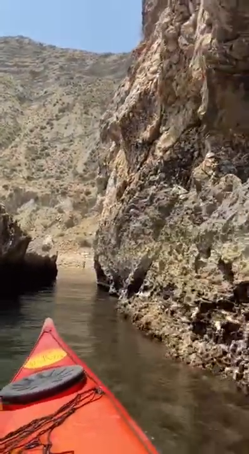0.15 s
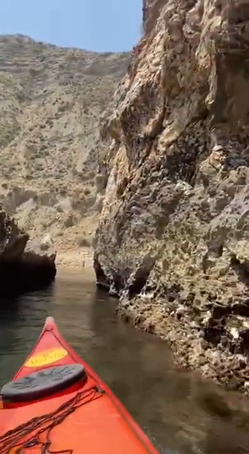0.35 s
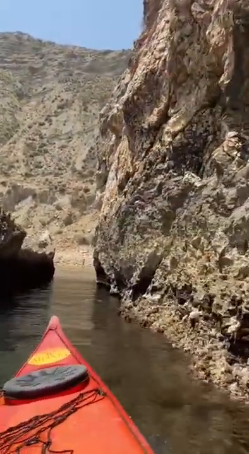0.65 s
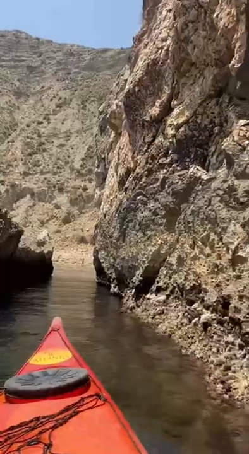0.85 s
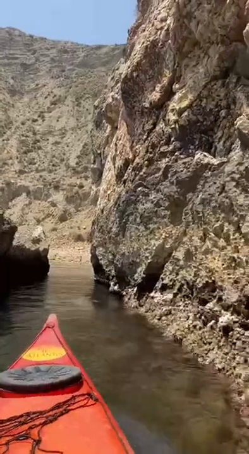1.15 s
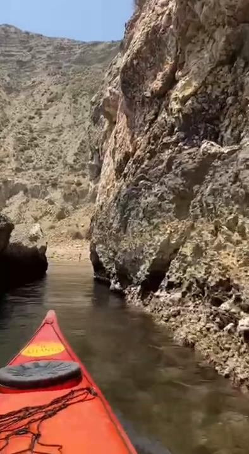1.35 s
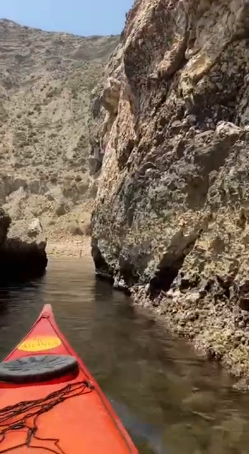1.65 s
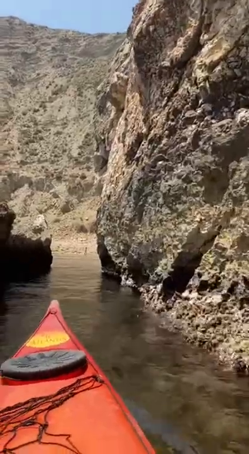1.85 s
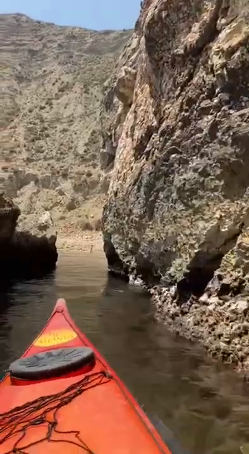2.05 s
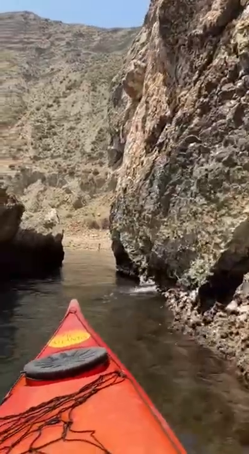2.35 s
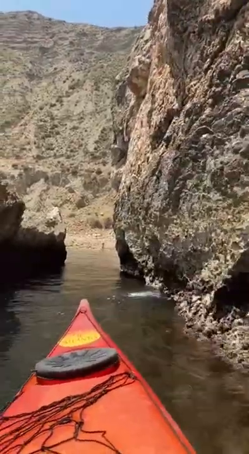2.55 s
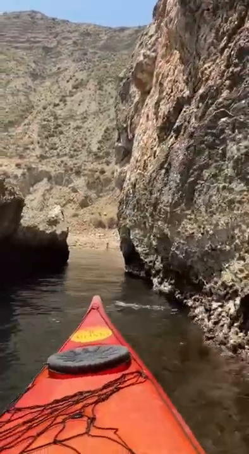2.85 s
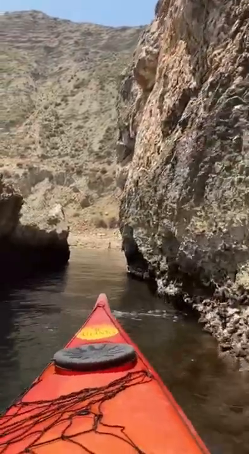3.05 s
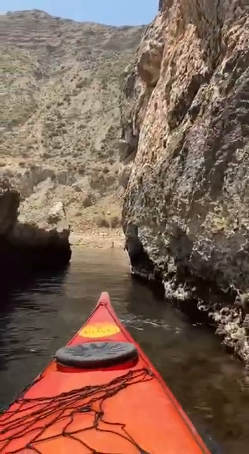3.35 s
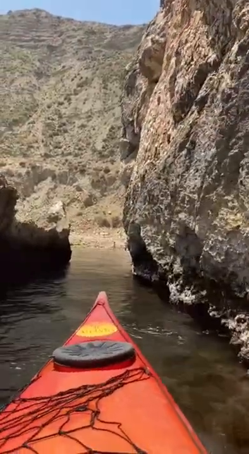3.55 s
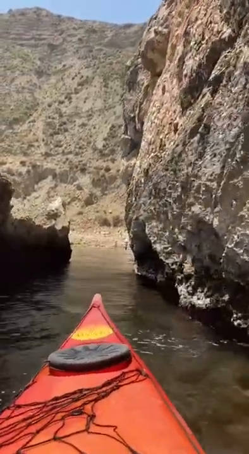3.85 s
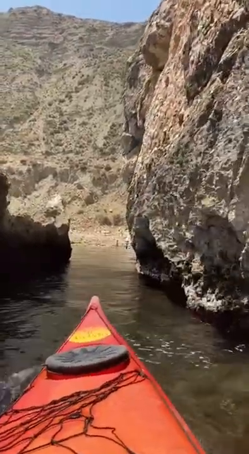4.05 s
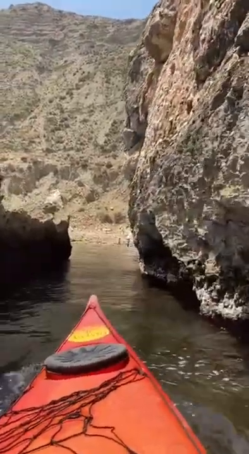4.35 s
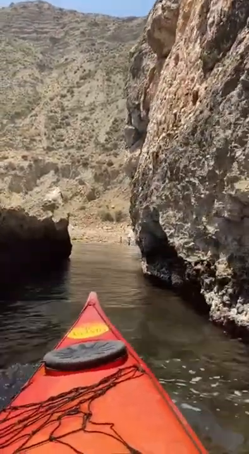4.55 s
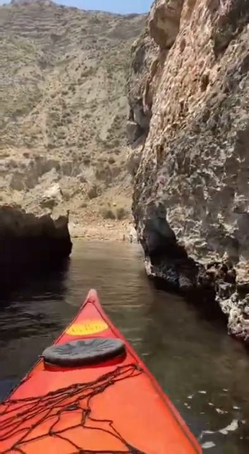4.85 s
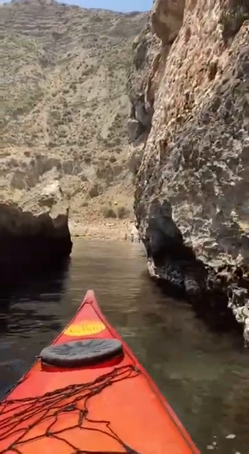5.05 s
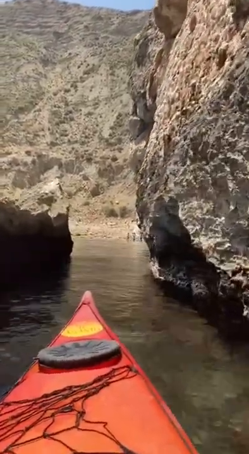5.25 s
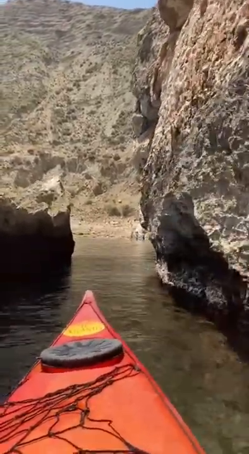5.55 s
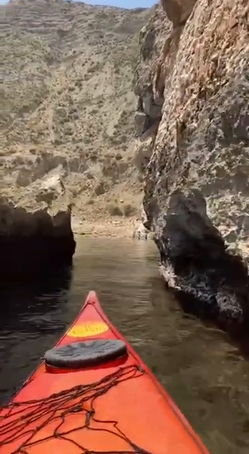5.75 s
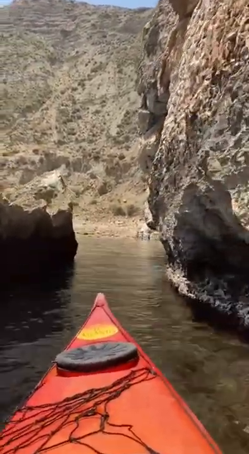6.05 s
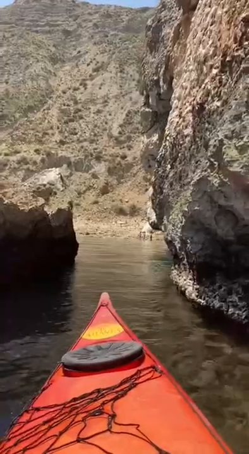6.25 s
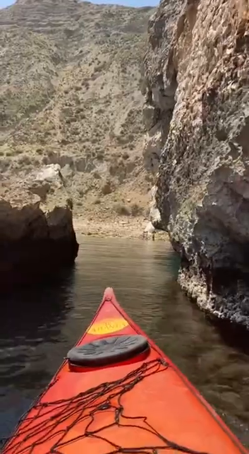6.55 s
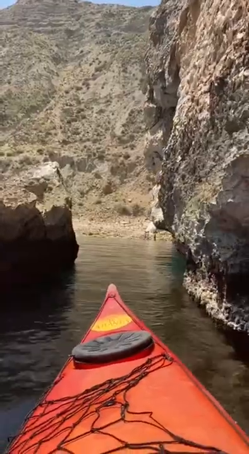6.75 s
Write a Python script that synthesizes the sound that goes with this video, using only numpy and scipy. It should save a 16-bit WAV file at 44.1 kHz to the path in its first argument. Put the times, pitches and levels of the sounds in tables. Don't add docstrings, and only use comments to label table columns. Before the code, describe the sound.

Calm water laps and gurgles along a hollow plastic kayak as the paddle bubbles and drips, with one heavy hull thump midway and another near the end.

```python
import sys
import numpy as np
from scipy import signal
from scipy.fft import rfft, irfft, next_fast_len
from scipy.io import wavfile
from scipy.ndimage import uniform_filter1d

SR = 44100
rng = np.random.default_rng(int(sys.argv[2]) if len(sys.argv) > 2 else 0)


def invert_db(level):
    return 10 ** (np.asarray(level, dtype=float) / 20)


def file_out(sig):
    cols = np.atleast_2d(sig).T
    lim = np.clip(cols, -1, 1)
    pcm = np.round(lim * 32767).astype(np.int16)
    wavfile.write(sys.argv[1], SR, pcm)


N = 304290

# start_s, level_db, t60_s at 1 kHz, tilt_db per octave
CRACKS = [
    (3.121, -18.5, 0.13, -6.5),
    (3.325, -41, 0.47, -5),
    (4.360, -33.5, 0.16, -1),
    (6.436, -30, 0.13, -2),
    (6.543, -26, 0.061, -4),
    (4.697, -42, 0.038, -2),
    (4.704, -42.5, 0.057, -4),
]
# start_s, peak_db,
# pitch_hz, t60_s, swell_s
HULL_MODES = [(3.12, -29, 1410, .04, .001), (3.122, -13.5, 760, 0.058, 0.00058),
              (3.1255, -1, 317, 0.057, 0.0012), (1.278, -33, 3610, 0.011, .001),
              (5.69, -35, 1650, 0.059, .006), (3.135, -8.5, 264, 0.13, 0.002), (3.163, -15, 240, .1, .006),
              (3.140, -8.5, 194, 0.16, 0.0038), (3.142, -2.5, 94, 0.16, 0.023),
              (3.175, -12.5, 72, 0.38, 0.0067), (3.300, -22, 74, 0.62, 0.027),
              (3.50, -31.5, 85, 0.44, 0.021), (1.445, -40, 47, 0.34, 0.046), (2.70, -48, 42.4, 0.13, 0.026),
              (4.697, -28.5, 770, 0.061, 0.0013), (4.360, -26, 731, 0.088, 0.0014),
              (4.363, -19, 285, 0.053, 0.0018), (4.368, -17.5, 199, 0.074, 0.004),
              (6.429, -13.5, 199, 0.045, 0.008), (6.4415, -0.5, 197.4, 0.031, 0.0073),
              (6.435, -21.5, 1400, 0.056, 0.011), (6.4366, -24, 840, 0.092, 0.0058),
              (6.442, -27, 2030, 0.075, 0.0022), (6.456, -33, 115, .15, 0.0091),
              (3.11, -36, 850, .04, .003), (3.134, -20, 780, .05, .002), (3.133, -30, 2000, .03, .002),
              (6.5265, -11, 342, 0.021, 0.0036), (6.5435, -14, 301, .07, 0.0017)]
# start_s, peak_db, pitch_hz,
# left_right_db
FREE_BUBBLES = [(0.893, -30.5, 530, -4), (0.935, -30.5, 820, -12), (1.215, -35, 821, 0),
                (1.742, -27.5, 472, 2.0), (1.97, -28.5, 860, 1), (2.296, -31, 910, 3.0),
                (3.324, -30, 501, 9), (3.701, -31, 590, 1), (3.729, -25, 490, -2), (3.952, -31, 546, 0),
                (4.282, -35, 727, 6), (4.359, -30, 735, 0), (4.468, -29.5, 690, 3.0),
                (4.697, -22, 1060, 6.0), (4.954, -28.5, 513, -2), (5.003, -32, 646, 3.5),
                (6.071, -31, 507, 1.5), (6.443, -20, 866, 1.0), (6.663, -24.5, 484, 2.0),
                (6.813, -30.5, 790, 11),
                (0.1496, -24.5, 1300, 2.0), (0.2049, -25, 1380, 7), (0.3356, -35.5, 2820, 0.0),
         (0.4913, -34.5, 1080, 8), (0.8974, -32, 1200, 6), (1.2795, -34, 1420, 16), (1.348, -33.5, 1020, 3),
         (1.4511, -35.5, 1980, 9), (1.5309, -29, 1400, 0.5), (3.1218, -13.5, 1420, 4),
         (3.5074, -35.5, 1980, 6), (3.6092, -24.5, 1380, -1.0), (3.7574, -37, 1610, 1.0),
         (4.0751, -33, 1560, 2.0), (4.4717, -36, 1380, 7), (4.4917, -31, 1360, 2.0),
         (4.5346, -29.5, 2220, 2), (5.0424, -28.5, 1190, 0.5), (5.2994, -34.5, 2090, -14),
         (5.636, -34.5, 1380, 3.0), (5.6755, -25.5, 1200, 14), (5.8436, -34, 1570, 8),
         (5.898, -33.5, 1570, 1.0), (6.2038, -35, 2420, -27), (6.4453, -21, 1450, -0.5),
         (6.546, -19.5, 1220, -1), (6.8129, -41, 1710, 0.5), (6.8623, -30, 1250, -0.5),
                (0.0643, -38.5, 2770, -1.0), (1.1767, -43, 3610, 2.0), (1.2116, -43, 3640, 1.0),
         (1.3458, -42, 3200, 0.0), (1.5693, -36, 2370, 0.5), (2.7082, -44, 2330, 0.0),
         (3.3228, -41, 2970, 2), (4.0467, -41, 3460, 0.0), (4.2996, -38.5, 2370, -2.0),
         (4.3635, -34, 2680, -1.0), (4.5865, -35, 2250, -2.0), (4.6016, -33, 2640, -1.0),
         (4.6453, -40, 2220, -0.5), (5.0015, -43, 2280, 1.0), (5.1472, -38.5, 3200, 1.0),
         (5.3368, -39.5, 2520, 0.0), (5.4056, -41, 3690, -1.5), (5.5747, -41, 2020, 1.0),
         (5.7528, -45, 3730, -0.5), (6.1135, -45, 2440, -1.0), (6.1689, -38, 2740, -0.5),
         (6.317, -37, 3320, 2.0), (6.5231, -27, 2120, 2.5), (6.5445, -28.5, 2360, 4.5),
         (6.6119, -38, 2500, 0.0), (6.8628, -34, 2350, -2.0),
                (3.356, -31, 732, 1.5), (3.424, -33, 826, 2.5), (3.511, -35, 807, 0.5), (3.669, -33, 1150, 0.5),
           (3.735, -30, 910, 0.0), (4.524, -31, 799, 3.5), (4.555, -30, 818, 7.0), (4.569, -27, 790, 4.5),
           (4.605, -30, 820, 4.0), (4.706, -28, 759, 4.0), (4.812, -38, 1100, 4.0), (4.877, -36, 875, 3.5),
           (5.053, -29, 1170, 4.0), (5.177, -42, 756, 4.0), (5.234, -36, 686, 1.0), (5.284, -39, 1010, 4.0),
           (5.299, -37, 816, 4.5), (5.387, -39, 818, 4.5), (5.696, -29, 1683, 5.0), (5.942, -34, 692, 3.0),
           (6.477, -21.5, 1090, 1.0), (6.502, -22, 1320, -0.5), (6.514, -26, 1360, 0.0),
           (6.527, -21, 1330, -1), (6.56, -27, 1180, 1.5), (6.574, -31, 1230, 1)]
# start_s, peak_db, pitch_hz, left_right_db
HELD_BUBBLES = [(0.258, -35, 862, 7.5), (1.498, -41, 654, 6), (1.617, -38, 1210, -5),
                (1.666, -25.5, 650, -4), (1.77, -32.5, 955, 2), (2.084, -30.5, 666, 6),
                (3.41, -28, 546, 13), (3.61, -30, 472, -4), (4.6977, -26.5, 1256, 3.5),
                (5.041, -33, 960, 4.5), (5.211, -29.5, 740, 3.5), (6.1689, -31.5, 1050, 4),
                (6.524, -20.5, 501, -2)]
# start_s, peak_db, pitch_hz, t60_s
GULPS = [(0.005, -24, 197, 0.12), (6.562, -19, 330, .07), (0.814, -24.5, 312, 0.043),
         (1.033, -30.5, 397, 0.1), (1.53, -31, 335, 0.11), (1.901, -20, 196, 0.05),
         (1.929, -18.5, 138, 0.1), (1.97, -24, 195, 0.077), (1.998, -22, 127, 0.076),
         (2.028, -25, 284, 0.093), (2.578, -31, 117, 0.13), (3.407, -22.5, 214, 0.052),
         (3.755, -23.5, 250, 0.074), (3.998, -26.5, 176, 0.079), (4.49, -26.5, 170, 0.057),
         (4.558, -24.5, 144, 0.1), (4.611, -23, 246, 0.075), (4.735, -25, 236, 0.04),
         (4.911, -24.5, 236, 0.076), (6.135, -24.5, 236, 0.041), (6.505, -17.5, 382, 0.055)]
# start_s, peak_db, t60_s
DROPS = [(0.062, -27, 0.025), (0.151, -30.5, 0.035), (0.2698, -33.5, 0.044), (0.5591, -46.5, 0.055),
         (0.728, -37.5, 0.036), (1.2785, -55, 0.045), (1.345, -38, 0.15), (1.39, -37, 0.11),
         (2.141, -48, 0.041), (3.12, -26, 0.051), (3.711, -48, 0.049), (3.755, -35.5, 0.04),
         (4.162, -44, 0.042), (4.365, -34, 0.049), (4.6967, -38, 0.048), (5.0095, -34, 0.043),
         (5.1474, -33, 0.019), (5.2225, -34.5, 0.039), (5.6387, -26.5, 0.062), (5.908, -33, 0.047),
         (6.068, -36, 0.04), (6.2038, -32.5, 0.045), (6.4383, -51, 0.045), (6.6836, -33, 0.057),
         (6.7396, -43, 0.045), (6.868, -52, 0.045)]
# pitch_hz, level_db per Hz
WATER_SPECTRUM = [(15, -50), (25, -34.5), (76, 3), (168, -5.5), (290, -6.5), (426, -13), (1360, -17.5),
                  (1850, -21.5), (3620, -28.5), (4690, -28), (6070, -30.5), (9400, -37), (11900, -54.5),
                  (15400, -89), (22000, -120)]
# pitch_hz, level_db, share of the wash's swing
CALM = [
    (75, -50.5, .2),
    (250, -46.5, 0.39),
    (1003, -50.3, 0.49),
]
# crest_s, lift_db, length_s, pitch_hz
SLOSHES = [(0.0, 13, 0.061, 229), (.235, 3, 0.25, 643), (.496, 11.5, 0.37, 28.8), (.817, 5, .085, 2290),
           (1.488, 12.5, 0.097, 3080), (1.494, 24.5, 0.071, 35), (1.77, 7.5, 0.021, 636),
           (1.885, 9.5, .02, 1500), (1.953, 17.5, 0.072, 280), (2.035, 8.5, 0.037, 497),
           (2.581, 12, .039, 142), (3.305, 11.5, .038, 159), (3.337, 24, 0.023, 97),
           (3.345, 17.5, 0.035, 2240), (3.384, 8.2, 0.33, 64), (3.738, 9.2, 0.084, 605),
           (4.026, 16.5, 0.12, 97), (4.413, 6.5, 0.16, 116), (4.578, 12.5, 0.055, 1500),
           (4.743, 12, 0.018, 141), (5.125, 2, 0.14, 568), (5.32, 6.5, 0.016, 894),
           (5.691, 7.9, 0.034, 596), (5.942, 3.8, 0.056, 689), (6.294, 5.5, 0.094, 391),
           (6.47, 40, .021, 32), (6.51, 18, 0.082, 1730), (6.539, 17.5, 0.068, 227), (6.743, 6, .039, 454),
           (6.9, 15, .026, 792)]
# centre_s, drop_db, length_s, pitch_hz
LULLS = [(0.236, 8, 0.041, 50), (0.4, 3, 0.049, 588), (1.11, 3.5, 0.022, 601), (1.269, 4, 0.17, 340),
         (1.63, 5.5, 0.17, 135), (2.496, 3, 0.052, 250), (2.85, 9.5, 0.075, 2027), (3.3, 5, 0.099, 896),
         (4.281, 8.1, 0.036, 109), (4.657, 9.9, 0.038, 599), (4.924, 7.9, 0.037, 87), (5.46, 8, 0.067, 888),
         (5.627, 1, 0.018, 199), (6.077, 5.2, 0.093, 97), (6.391, 8.5, 0.021, 546), (6.636, 4.6, 0.036, 75)]
# time_s, level_db
WASH = [(0.0, -54.5), (0.13, -64), (0.4, -66.5), (1.29, -61), (2.0, -56.2), (2.3, -63.5), (2.54, -65.5),
        (2.65, -62.5), (3.07, -64.5), (3.32, -57), (3.57, -58.5), (4.19, -58), (4.38, -61.5), (4.6, -55),
        (4.9, -61.5), (6.05, -59.5), (6.23, -57.5), (6.9, -56)]
# pitch_hz, width_hz, lift_db
HULL_COLOUR = [(126, 17.3, 4.5), (357, 82, 4), (665, 23.3, 1), (1380, 200, 0.5)]
# pitch_hz, level_db
SPREAD = [(60, -31), (200, -26), (350, -12), (620, -4), (1100, -1), (1500, -5.5), (2400, 0), (3500, -2),
          (4700, 1), (5500, 4), (7600, 2), (9500, -1), (10800, 11), (11800, 0)]
# pitch_hz, half_width_hz, depth_db
SUM_DIPS = [(4640, 380, -36), (11500, 1700, -14)]
# pitch_hz, half_width_hz, depth_db
DIFFERENCE_DIPS = [(1850, 180, -14), (6450, 950, -30)]
# time_s, width_factor
DIP_WIDTH = [(0, 0.45), (.35, .8), (.75, .5), (1.3, 0.8), (1.45, 1.4), (1.7, 0.96), (2.3, 0.82),
             (3.05, 0.43), (3.25, 1.35), (3.75, 1.27), (4.0, .6), (4.5, 0.61), (5.0, 1.22), (5.3, 0.7),
             (5.57, 1.44), (6.15, .7), (6.3, 1.53), (6.9, 0.88)]
# pitch_hz, margin_db
SUM_GATE = [(1500, -13), (2600, -8.5), (6000, -8), (8000, -4), (9200, -1), (10200, 4), (11000, 10),
            (12000, 14)]
# pitch_hz, margin_db
DIFFERENCE_GATE = [(1500, -11), (3300, -8), (5000, -9), (8000, -6), (9500, -8), (11500, -7), (12000, -2)]

RISE_SHARE, REACH_OCTAVES = 1.12, 1.45
RING_S, RING_SHRINK, HELD_RING_S = 0.031, 0.3, 0.082
UNDER_DB, WHIM_DB = 8, 4
CUTOFF_HZ = 11800


def knocks():
    out = np.zeros(N)
    t = np.arange(9000) / SR
    for s, db, t60, tilt_db in CRACKS:
        for octave in range(-1, 4):
            hz = 1000 * 2.0 ** octave
            octave_t60 = t60 * 2 ** (-0.2 * octave)
            fade = invert_db(db + tilt_db * octave - 60 * t / octave_t60) * (1 - np.exp(-t / 0.0047))
            noise = rms_one(rng.standard_normal(len(t)))
            crack = band(fade * noise, hz / np.sqrt(2), hz * np.sqrt(2))
            add(out, s, crack * invert_db(15 - 2.66 * octave))
    for s, db, hz, t60, swell_s in HULL_MODES:
        add(out, s, plop(db, hz, t60, swell_s, glide=0))
    return out


def bubbles():
    centre, lean = np.zeros(N), np.zeros(N)
    free = FREE_BUBBLES
    for rows, ring_s, shrink in (free, RING_S, RING_SHRINK), (HELD_BUBBLES, HELD_RING_S, 0):
        for s, db, hz, pan_db in rows:
            t60 = ring_s * (1000 / hz) ** shrink
            ring = plop(db - 2.5, hz, t60, swell_s=0.00075, glide=0.052)
            add(centre, s, ring)
            add(lean, s, ring * np.tanh(pan_db / 17))
    for s, db, hz, t60 in GULPS:
        add(centre, s, plop(db - 6, hz, t60, swell_s=0.012, glide=0.12))
    return centre, lean


def plop(peak_db, hz, t60, swell_s, glide):
    t = np.arange(int(t60 * SR * 1.2) + 50) / SR
    shape = (1 - np.exp(-t / swell_s)) * invert_db(-60 * t / t60)
    phase = 2 * np.pi * hz * (t + glide * t * t / t60 / 2)
    return invert_db(peak_db) * shape / shape.max() * np.sin(phase)


def drops():
    out = np.zeros(N)
    t = np.arange(2000) / SR
    for (s, db, t60), noise in zip(DROPS, rng.standard_normal((len(DROPS), 2000))):
        fade = invert_db(db + 2 - 60 * t / t60) * (1 - np.exp(-t / 0.008))
        add(out, s - 0.004, fade * noise)
    return band(out, 2600, 13000)


def froth(per_s, level_db, spread_db):
    lapping_db = stirring()[2]
    out = np.zeros((2, N))
    for when, pitch, size, life, side in rng.random((1200, 5))[:int(per_s * N / SR)]:
        hz = 480 * 2 ** (3.1 * pitch ** 1.2)
        db = lapping_db[int(when * N)] + level_db
        db = db - 3 * np.log2(hz / 1000) - spread_db * np.log(1 - 0.8 * size)
        ring = plop(db, hz, (14 + 36 * life) / hz, swell_s=0.0011, glide=0.055)
        add(out, when * N / SR, ring * [[1], [2 * side - 1]])
    return out


def water(patchy_db, grain_per_cycle, grain_db, size_db):
    levels = stirring()
    levels[3] = levels[3] + 3 + 0.24 * (levels[2] + 46.5)
    levels.insert(3, 0.53 * levels[2] + 0.44 * levels[3] - 3.5)
    edges = 28 * 2 ** np.arange(0, 8.9, 0.44)
    groups = np.zeros((5, 2, N))
    white = rng.standard_normal((2, 2, N))
    chance = rng.random((2, 2, N))
    sizes = invert_db(size_db * np.minimum(rng.exponential(1, (2, N)), 4)) * rng.choice([-1, 1], (2, N))
    together = drift(9.0)
    for k, (low, high) in enumerate(zip(edges, edges[1:])):
        hz = np.sqrt(low * high)
        struck = np.roll(chance[k % 2], 1499 * k, axis=1) < grain_per_cycle * np.sqrt(hz) / SR
        grains = np.roll(sizes, 997 * k, axis=1) * struck
        mix = white[k % 2] + invert_db(grain_db) * rms_one(grains)
        gain = invert_db(at_hz(WATER_SPECTRUM, hz) + patchy_db * (0.49 * together + drift(28.6)))
        groups[np.searchsorted([130, 450, 2200, 4600], hz)] += gain * band(mix, low, high)
    return sum(invert_db(level + 1.5) * rms_one(g) for level, g in zip(levels, groups))


def stirring():
    t = np.arange(0, N + 64, 64) / SR
    wash_db = np.interp(t, *np.transpose(WASH))
    levels = []
    for hz, db, share in CALM:
        calm_db = db + share * (wash_db - wash_db.mean())
        lull_db = swell(LULLS, t, hz, 1).sum(axis=0)
        lift = 1 + np.sum(invert_db(swell(SLOSHES, t, hz, RISE_SHARE)) - 1, axis=0)
        levels.append(calm_db - lull_db + 20 * np.log10(lift))
    return [np.interp(np.arange(N) / SR, t, level) for level in levels + [wash_db]]


def swell(rows, t, hz, rise_share):
    s, db, length, pitch = np.transpose(rows)[:, :, None]
    ago = (t - s) / (length * np.where(t < s, rise_share, 1))
    octaves = np.log2(pitch / hz) / REACH_OCTAVES
    return db * np.exp(-ago ** 2 - octaves ** 2)


def drift(rate):
    r = np.exp(-80 * np.pi * rate / SR)
    slow = signal.lfilter([1], [1, -2 * r, r * r], rng.standard_normal(N // 40 + 2002))[2000:]
    return np.interp(np.arange(N) / 40, np.arange(len(slow)), rms_one(slow))


def scattered(x, t60):
    t = np.arange(600) / SR
    tail = rng.standard_normal(len(t)) * invert_db(-60 * t / t60)
    tail[0] = 1.7
    return signal.fftconvolve(x, tail / np.linalg.norm(tail))[:N]


def wandering_dips(x, dips, sink, flutter_db, widen):
    hz, s, cells = signal.stft(x, SR, nperseg=1024)
    at = np.minimum((s * SR).astype(int), N - 1)
    for one in dips:
        width = widen[at] * invert_db(flutter_db * drift(15.6)[at])
        cells = cells * dip(hz[:, None], [one], 1 - sink * (width - 1), width)
    return signal.istft(cells, SR, nperseg=1024)[1][:N]


def dip(hz, dips, shift=1, widen=1):
    total_db = 0
    for centre_hz, width_hz, db in dips:
        total_db = total_db + db * np.exp(-((hz - centre_hz * shift) / (width_hz * widen)) ** 2)
    return invert_db(total_db)


def rms_one(x):
    return x / np.sqrt(np.mean(x ** 2) + 1e-20)


def at_hz(points, hz):
    points_hz, level_db = np.transpose(points)
    return np.interp(np.log(hz), np.log(points_hz), level_db)


def band(x, low_hz, high_hz):
    return signal.sosfilt(signal.butter(2, [low_hz, high_hz], "band", fs=SR, output="sos"), x)


def add(out, s, piece):
    i = int(s * SR)
    out[..., i:i + piece.shape[-1]] += piece[..., :N - i]


def scene():
    total, difference = (water(patchy_db=3.0, grain_per_cycle=3.0, grain_db=-4.5, size_db=2.5)
                         + froth(per_s=160, level_db=2.8, spread_db=3.5))
    centre, lean = bubbles()
    spits = drops()
    near = centre + spits + knocks()
    size = next_fast_len(N + 4096)
    hz = np.maximum(np.fft.rfftfreq(size, 1 / SR), 1)
    total, difference = rfft([total, difference], size) * dip(hz, HULL_COLOUR)
    dip_centres = [centre_hz for centre_hz, *_ in DIFFERENCE_DIPS + SUM_DIPS[:1]]
    swaps = np.sign(np.prod([centre_hz - hz for centre_hz in dip_centres], axis=0))
    difference = difference + (0.15 - 0.6j * swaps) * total
    difference = difference + invert_db(3.0) * rfft(scattered(near, t60=0.006), size)
    difference = irfft(difference * invert_db(at_hz(SPREAD, hz)), size)[:N]
    difference = wandering_dips(difference, DIFFERENCE_DIPS, sink=-0.06, flutter_db=3.0, widen=np.ones(N))
    difference = difference + 0.5 * lean + 0.055 * band(near, 20, 260)
    widen = np.interp(np.arange(N) / SR, *np.transpose(DIP_WIDTH))
    total = irfft(total, size)[:N] + near
    total = wandering_dips(total, SUM_DIPS, sink=0.07, flutter_db=1.5, widen=widen)
    total = total + 0.4 * band(spits, 3900, 5300) + 0.2 * band(spits, 9500, 11800)
    return np.array([total + difference, total - difference])


def mute_weak_bands(x):
    hz, s, cells = signal.stft([x[0] + x[1], x[0] - x[1]], SR, nperseg=1024, noverlap=768)
    row, frame = np.arange(len(hz)) // 4, (np.arange(len(s)) + 3) // 4
    band_hz = hz[::4] + 85
    power = np.zeros((2, row[-1] + 1, frame[-1] + 1))
    np.add.at(power, (slice(None), row[:, None], frame), np.abs(cells) ** 2)
    level_db = 10 * np.log10(power + 1e-20)
    lately_db = uniform_filter1d(level_db[1, 44:56].mean(axis=0), 9)
    margin_db = [at_hz(SUM_GATE, band_hz), at_hz(DIFFERENCE_GATE, band_hz)]
    usual_db = np.median(level_db - lately_db, axis=2) + margin_db
    whim = rms_one(uniform_filter1d(rng.standard_normal(level_db.shape), 2))
    judged_db = level_db + WHIM_DB * whim
    faint = judged_db < usual_db[..., None] + lately_db
    outdone = (judged_db < level_db[::-1] - UNDER_DB) & (band_hz[:, None] < 9000)
    muted = (faint | outdone) & (band_hz[:, None] > 1500)
    cells *= ~muted[:, row][:, :, frame]
    total, difference = signal.istft(cells, SR, nperseg=1024, noverlap=768)[1][:, :N] / 2
    return np.array([total + difference, total - difference])


def band_limit(x):
    return signal.sosfilt(signal.butter(12, 12010, fs=SR, output="sos"), x)


def record(dry):
    top = signal.ellip(8, 0.5, 70, CUTOFF_HZ, fs=SR, output="sos")
    rounded = 1.03 * np.tanh(dry / 1.093)
    mix = mute_weak_bands(signal.sosfilt(top, rounded))
    return band_limit(mix)


dry = scene()
out = record(dry)
file_out(out)
```